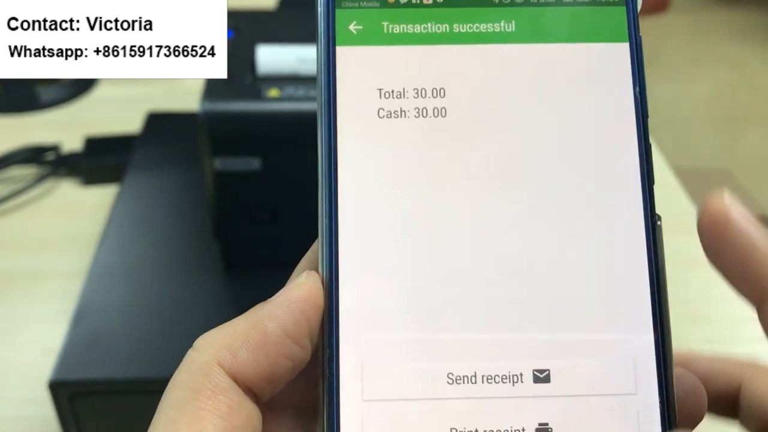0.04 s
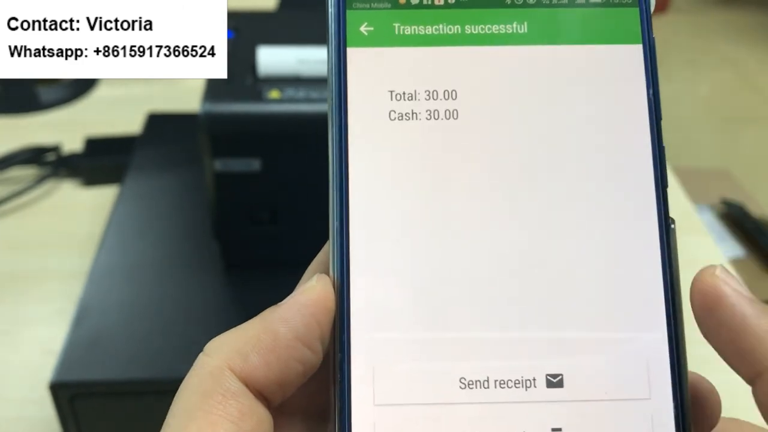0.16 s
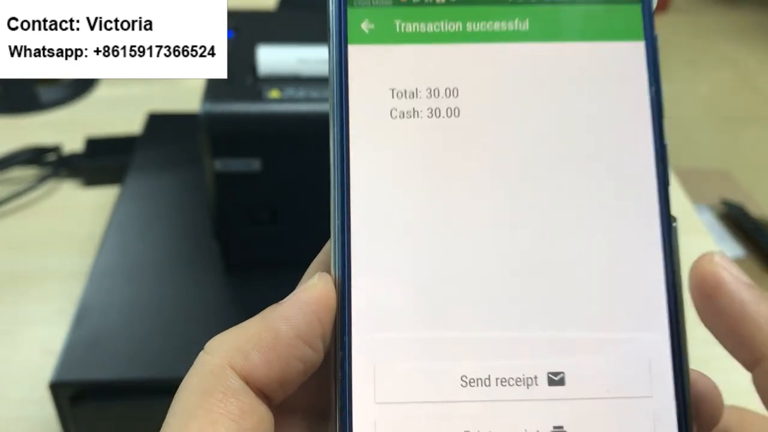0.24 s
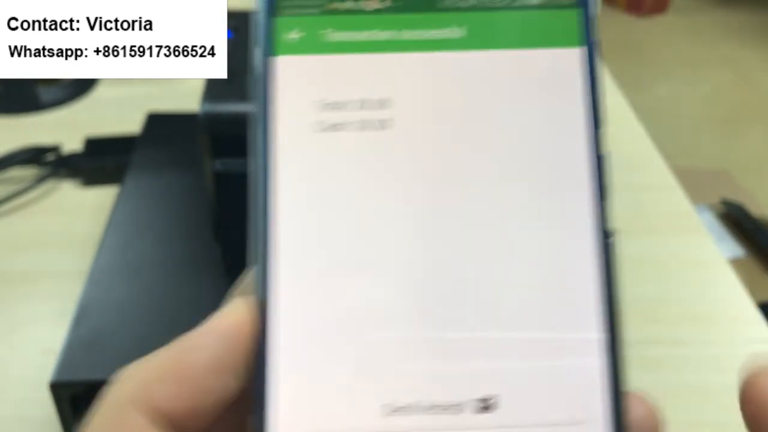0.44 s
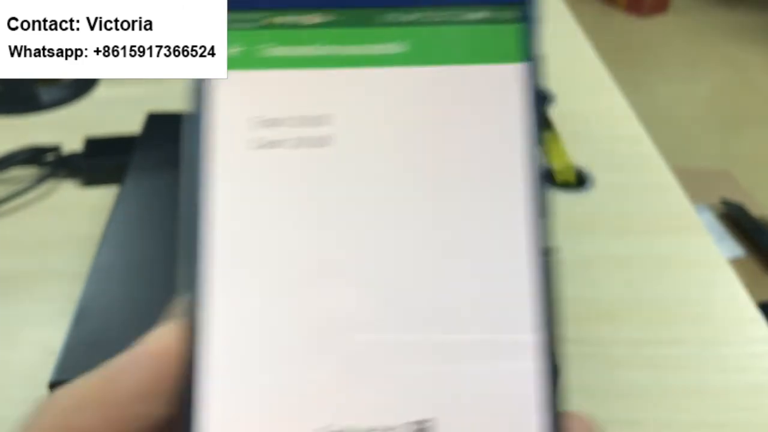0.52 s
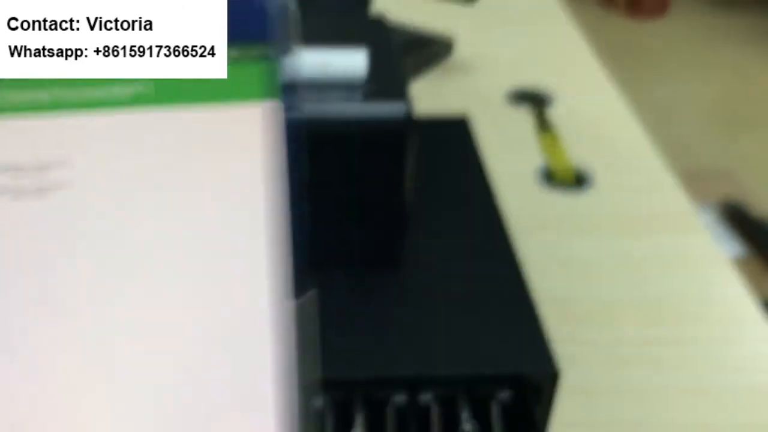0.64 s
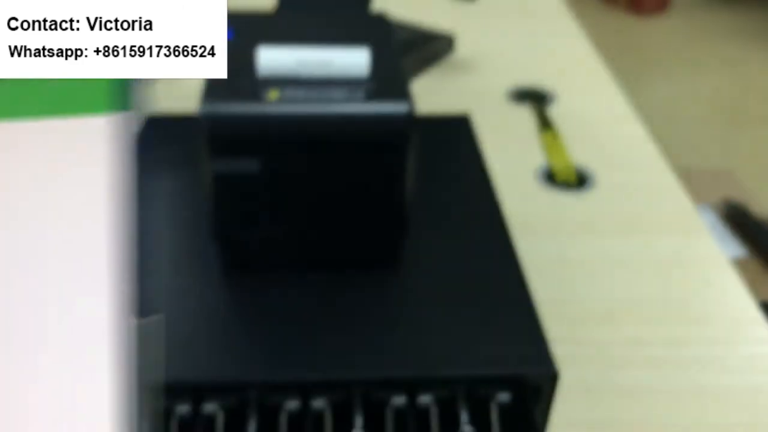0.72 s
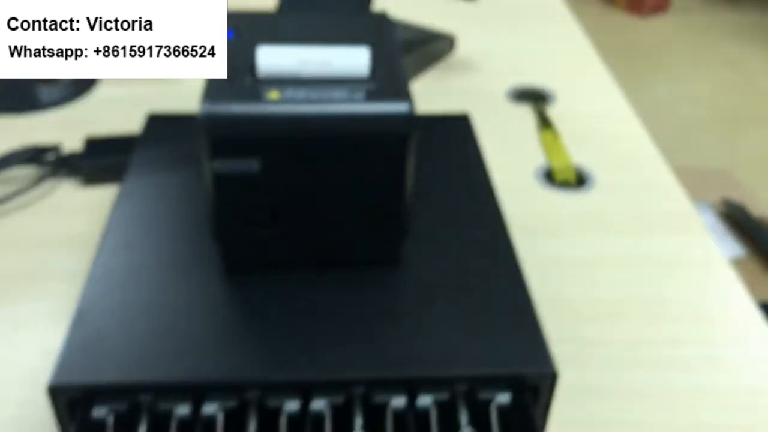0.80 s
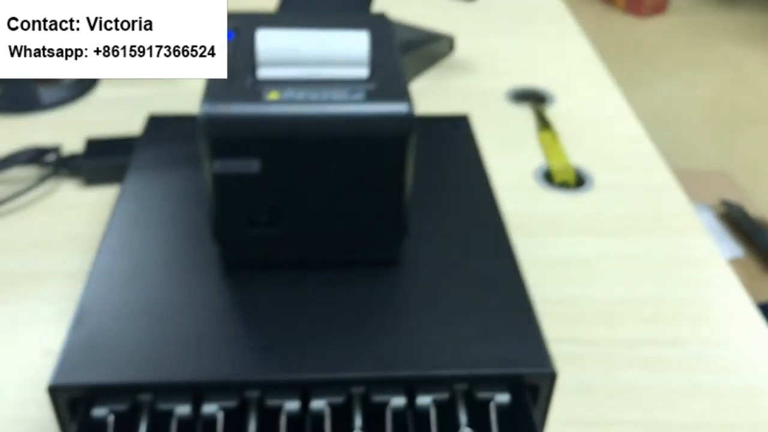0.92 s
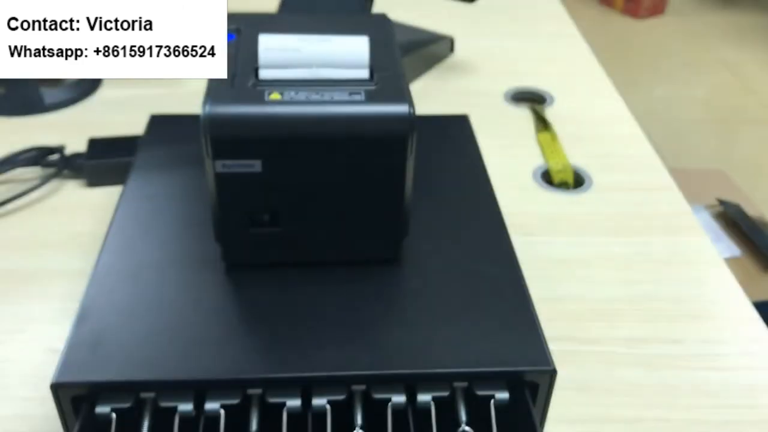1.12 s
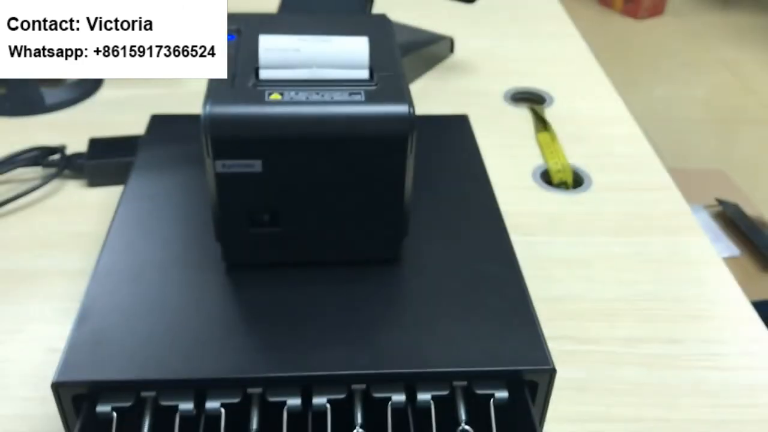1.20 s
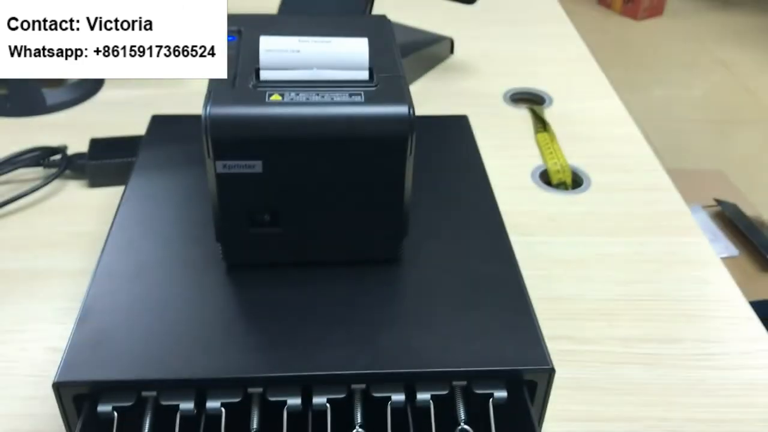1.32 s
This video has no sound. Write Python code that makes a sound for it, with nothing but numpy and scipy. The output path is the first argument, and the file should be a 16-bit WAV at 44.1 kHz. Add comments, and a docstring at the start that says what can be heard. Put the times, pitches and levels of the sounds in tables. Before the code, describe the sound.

Close microphone in a quiet, slightly reverberant office: a cash drawer latch snaps loudly, the tray rolls out and slams against its stop, metal rattles and settles, then a short paper hiss and small plastic clicks.

```python
"""A sheet-steel cash drawer under a receipt printer on a desk, heard from close by in a quiet office.
Its latch clacks and rebounds, and the tray rolls out with knocks and bangs against its stop:
gritty contact noise excites the modes of the steel case, and damped sines add ringing parts.
The printer clicks, drones low and feeds paper with a short hiss, all as coloured, shaped noise.
The room rings on as decaying noise over a nearly steady air hum."""
import sys
import numpy as np
from scipy import signal
from scipy.fft import rfft, irfft, next_fast_len
from scipy.io import wavfile
from scipy.ndimage import map_coordinates

SR = 44100
rng = np.random.default_rng(int(sys.argv[2]) if len(sys.argv) > 2 else 0)


def elevation(decibels):
    """Turn decibel levels (scalar or array-like) into linear amplitude ratios."""
    levels = np.asarray(decibels, float)
    return 10 ** (levels / 20)


def waveform_to_disk(signal):
    """Save audio, clipped to [-1, 1], as 16-bit WAV at the path in sys.argv[1]."""
    frames = np.transpose(np.atleast_2d(signal))
    scaled = np.clip(frames, -1, 1) * 32767
    samples = np.round(scaled).astype(np.int16)
    wavfile.write(sys.argv[1], SR, samples)


N = 59535

# Ventilation and office hum: time_s, level_db
AIR_LEVEL = [(0, -50), (1.05, -50), (1.35, -49)]
# Spectrum of the air hum: frequency_hz, relative_density_db
AIR_TONE = [(12, -24), (20, -1), (172, -6.5), (241, -9.5), (319, -11), (527, -16), (825, -17), (9950, -42),
            (15000, -59)]

# Bright printer clicks: start_s, level_db, contact_s, t60_s
CLICKS = [(.2253, -47.5, 0.009, 0.085), (.8003, -24.5, 0.0063, 0.0067), (.999, -33.5, 0.0055, 0.015),
          (1.0255, -23, 0.0015, 0.034), (1.2554, -44, 0.0021, 0.015)]
# Spectrum of clicks and paper ticks: frequency_hz, relative_density_db
CLICK_TONE = [(350, -50), (600, -1), (1560, -8), (2750, -8.5), (3410, 1), (4770, -6.5), (5320, 0),
              (7450, -2.5), (15000, -40)]
# Duller clunks of the printer shell: start_s, level_db, contact_s, t60_s
CLUNKS = [(1.0262, -24.5, 0.0075, 0.037)]
# Spectrum of the clunks: frequency_hz, relative_density_db
CLUNK_TONE = [(120, -25), (420, -11.5), (708, 2.5), (2800, -16), (3300, -41), (4000, -21), (5200, -43)]
# Modes of the printer's plastic shell and gears: pitch_hz, half_width_hz, weight_db (before ring)
PRINTER_MODES = [(692, 36, 4.5), (1283, 90, 4.5), (1587, 107, 5.5), (2333, 32, 4), (3330, 70, 2.5),
                 (3970, 230, 3), (5400, 51, 2), (7040, 110, 1.5)]

# Latch clack and rebounds: start_s, level_db, contact_s, t60_s
LATCH = [(.2452, -7, 0.0043, 0.038), (.256, -21, 0.027, 0.24), (.316, -40, 0.0028, 0.018),
         (.3205, -21, 0.0089, 0.022)]
# Spectrum of the latch and spring clips: frequency_hz, relative_density_db
LATCH_TONE = [(59, -40), (100, -14), (229, -8.5), (1010, -6), (1390, -0.5), (2420, -7.5), (4020, -2),
              (6560, -4), (12900, -15.5), (16000, -29)]
# Modes of the steel case: pitch_hz, half_width_hz, weight_db (before ring)
CASE_MODES = [(245, 31, 3.5), (312, 94, 2), (530, 28, 5), (630, 31, 4.5), (708, 44, 3), (760, 19, 0.5),
              (953, 22, 6.5), (1250, 76, 6), (1474, 140, 4.5), (1650, 84, 5), (1955, 46, 6),
              (3980, 63, 5.5), (4490, 50, 3), (5340, 79, 4)]

# Single panels of the case ring out: start_s, initial_level_db, pitch_hz, t60_s
PANELS = [(.247, -11, 1409, .05), (.322, -22, 734, 0.063), (.474, -25, 530, 0.038),
          (0.474, -20, 954, 0.046), (.6255, -7.5, 735, 0.03), (.63, -18.5, 312, 0.11),
          (.643, -21.5, 255.3, 0.26), (.648, -28.5, 154.8, 0.28), (.662, -18, 688, 0.075),
          (.912, -27.5, 713, 0.047)]
# Small parts ping, loose metal of the drawer and the printer's shell at its clicks: start_s, initial_level_db,
# pitch_hz, t60_s
PINGS = [(.631, -14, 4340, 0.037), (.694, -24, 4140, .025), (.7265, -23, 4260, 0.012),
         (.801, -21, 3330, 0.025), (.801, -25.5, 1514, 0.032), (1.027, -25, 1558, 0.053),
         (1.0262, -26.5, 3915, 0.032), (1.255, -45, 2290, 0.074)]
# The desk takes the shove: start_s, initial_level_db, pitch_hz, t60_s
SHOVES = [(0.647, -23, 65.5, 0.17), (0.69, -36, 72, 0.16)]

# Rolling, then shaking of the tray: time_s, level_db
ROLL_LEVEL = [(.262, -30.5), (.36, -37.5), (.42, -38), (.52, -36.5), (.6, -34), (.7, -38), (.8, -40),
              (.93, -41.5), (1.0, -50)]
# Spectrum of the rolling: frequency_hz, relative_density_db
ROLL_TONE = [(71, -33), (120, -8.5), (253, 2), (484, -7.5), (852, -5), (1110, -10), (1200, -16.5),
             (5140, -30), (15000, -42)]
# Knocks of the rolling tray: start_s, level_db, contact_s, t60_s
KNOCKS = [(.41, -29, 0.0023, 0.068), (.423, -29, 0.0021, 0.038), (.468, -31, 0.0037, 0.014),
          (.4745, -29, 0.001, 0.089), (.53, -40, 0.026, 0.15)]
# Spectrum of the knocks: frequency_hz, relative_density_db
KNOCK_TONE = [(88, -23), (150, -8), (467, -3), (991, -8.5), (2180, -14.5), (3390, -15), (5560, -20.5),
              (12000, -33.5), (15600, -74)]

# Low drone felt through the desk: time_s, level_db
MOTOR_LEVEL = [(.5, -52), (.58, -47.5), (.8, -55), (.9, -46), (1.05, -47), (1.2, -49.5), (1.35, -55)]
# Spectrum of the drone: frequency_hz, relative_density_db
MOTOR_TONE = [(25, -70), (40, -13.5), (60, -1.5), (85, 10), (105, -21.5), (300, -50)]

# The tray's bangs at its stop: start_s, level_db, contact_s, t60_s
STOP = [(.6225, -18, 0.0055, 0.16), (.627, -18, 0.0059, 0.064), (.641, -35.5, 0.0037, 0.18)]
# Spectrum of the bangs: frequency_hz, relative_density_db
STOP_TONE = [(180, -29), (300, 1.5), (735, 1.5), (1090, -2.5), (1630, -1.5), (2770, -4.5), (4480, -5),
             (8840, -9), (10600, -24.5), (11700, -19.5), (15800, -36)]
# The tray's spring clips jangle after the stop: start_s, level_db, contact_s, t60_s
CLIPS = [(.629, -37, 0.013, 0.23)]
# Thuds of the case after the stop: start_s, level_db, contact_s, t60_s
THUDS = [(.634, -22.5, 0.013, 0.068), (.647, -20, 0.0027, 0.12), (.668, -20.5, 0.0025, 0.13),
         (.718, -29.5, 0.0052, 0.068), (.77, -43, 0.017, 0.19), (.999, -33, 0.0063, 0.024),
         (1.04, -41, 0.011, 0.11)]
# Spectrum of the thuds: frequency_hz, relative_density_db
THUD_TONE = [(40, -25), (90, 1), (287, 2), (379, -0.5), (433, -10.5), (624, -3.5), (862, -3.5),
             (1300, -13.5), (3000, -14.5), (4200, -61)]

# A faint broad rustle: time_s, level_db
RUSTLE_LEVEL = [(.82, -51), (1.05, -44.5), (1.15, -52), (1.35, -53)]
# Spectrum of the rustle: frequency_hz, relative_density_db
RUSTLE_TONE = [(470, -32), (800, -20), (895, 0), (1780, -8), (2680, -7.5), (7950, -16), (15800, -52)]
# Hiss of the paper feed: time_s, level_db
PAPER_LEVEL = [(0.888, -49), (0.916, -45.5), (0.982, -35.5), (1.0, -39.5)]
# Spectrum of the feed hiss: frequency_hz, relative_density_db
PAPER_TONE = [(1700, -34), (3270, -8), (4630, -13), (8850, -7.5), (11300, -24), (14000, -15.5),
              (15600, -38)]
# The paper edge catches: start_s, level_db, contact_s, t60_s
TICKS = [(.8915, -30, 0.00073, 0.0036), (.8965, -35, 0.0017, .006)]

# Decay of the room: frequency_hz, t60_s
ROOM_DECAY = [(100, 0.51), (600, 0.67), (3000, 0.73), (12000, 0.47)]

ATTACK_S, FADE_S = 0.001082, 0.004  # rise of a blow or ring; fade at both ends of a rub
STRIKE_DB = 10  # the first contact of a blow over its chatter
FLEX_SHIFT, FLEX_PER_S = 0.046, 25  # spread of the detuning as a share of pitch; pace of wandering
ROOM_DB, UNEVEN_DB = -12, -35  # the room's sound; the faint difference between the channels


def unit(x):
    """Normalisation: a signal divided by its root mean square has unit power."""
    return x / np.sqrt(np.mean(x ** 2) + 1e-20)


def along(points, hz):
    """Logarithmic frequency scale: values are interpolated linearly in log frequency."""
    f, v = np.transpose(points)
    return np.interp(np.log(hz + 1), np.log(f + 1), v)


def coloured(x, tone, modes=(), ring=1):
    """Minimum-phase filtering: a causal response of unit mean power, with resonances at the modes."""
    m = 2 * (next_fast_len(N + SR // 2) // 2)
    hz = np.fft.rfftfreq(m, 1 / SR)
    resonance_db = sum(2 * db / (1 + ((hz - c) / w) ** 2) for c, w, db in modes)
    level_db = np.maximum(along(tone, hz), -90) + ring * resonance_db
    # folding the cepstrum onto positive time makes the response causal
    cepstrum = irfft(np.log(unit(elevation(level_db))), m)
    cepstrum[1:m // 2] *= 2
    cepstrum[m // 2 + 1:] = 0
    response = np.exp(rfft(cepstrum))
    return irfft(rfft(x, m) * response, m)[:N]


def flexing(x, tone, modes, ring):
    """Wandering resonance: the sound passes by turns through three detuned copies of the object."""
    knots = rng.standard_normal((3, int(N * FLEX_PER_S / SR) + 4))
    position = np.meshgrid(np.arange(3), np.arange(N) * FLEX_PER_S / SR, indexing="ij")
    turns = np.exp(2 * map_coordinates(knots, position))
    share = turns / turns.sum(0)
    out = np.zeros(N)
    for part in share:
        detuned = [(hz * (1 + FLEX_SHIFT * rng.standard_normal()), w, db) for hz, w, db in modes]
        out += coloured(part * x, tone, detuned, ring)
    return out


def grit(spread_db, grain_s):
    """Granular contact noise: many tiny contacts of scattered size, at unit power."""
    size_db = spread_db * rng.standard_normal(int(N / SR / grain_s) + 2)
    grain = (np.arange(N) / SR / grain_s).astype(int)
    return unit(rng.standard_normal(N) * elevation(size_db[grain]))


def blows(rows, tone, modes, ring):
    """Impact: one clean contact, chatter for the contact length, then an exponential rattle."""
    t = np.arange(N) / SR
    envelope = np.zeros(N)
    for start, db, contact, t60 in rows:
        decay = elevation(db - 60 * np.clip(t - start - contact, 0, None) / t60)
        envelope += decay * np.clip((t - start) / ATTACK_S, 0, 1)
    start, db = np.transpose(rows)[:2]
    strikes = np.bincount(((start + ATTACK_S) * SR).astype(int), elevation(db + STRIKE_DB), N)
    chatter = envelope * grit(spread_db=2.5, grain_s=0.0006)
    return coloured(chatter + strikes, tone, modes, ring)


def rubbing(rows, tone, modes, ring, spread_db, grain_s, colour=coloured):
    """Friction: gritty contact noise follows a level curve and fades at both ends."""
    t = np.arange(N) / SR
    s, db = np.transpose(rows)
    gate = np.clip(np.minimum(t - s[0], s[-1] - t) / FADE_S, 0, 1)
    rub = gate * elevation(np.interp(t, s, db)) * grit(spread_db, grain_s)
    return colour(rub, tone, modes, ring)


def rings(rows):
    """Free vibration: each row is one exponentially damped sine with a soft start."""
    t = np.arange(N) / SR
    out = np.zeros(N)
    for start, db, hz, t60 in rows:
        after = np.clip(t - start, 0, None)
        decay = elevation(db - 60 * after / t60) * np.clip(after / ATTACK_S, 0, 1)
        out += decay * np.sin(2 * np.pi * hz * after)
    return out


def air():
    """Broadband flow noise: ventilation and office hum as random noise with a falling spectrum."""
    level = elevation(np.interp(np.arange(N) / SR, *np.transpose(AIR_LEVEL)))
    return level * unit(coloured(rng.standard_normal(N), AIR_TONE))


def printer_impacts():
    """Impact on a shell: bright clicks and duller clunks excite the plastic shell and gears."""
    clicks = blows(CLICKS, CLICK_TONE, PRINTER_MODES, ring=1.5)
    return clicks + blows(CLUNKS, CLUNK_TONE, PRINTER_MODES, ring=0.79)


def latch():
    """Impact and rebound: the latch strikes repeatedly and excites the modes of the case."""
    return blows(LATCH, LATCH_TONE, CASE_MODES, ring=0.37)


def ringing_parts():
    """Free vibration: case panels, small loose metal parts, the printer's shell and the desk ring at single
    pitches."""
    return rings(PANELS + PINGS + SHOVES)


def rolling_tray():
    """Rolling friction: fine grit drives case modes that wander as the tray moves."""
    return rubbing(ROLL_LEVEL, ROLL_TONE, CASE_MODES, ring=0.65, spread_db=1.5, grain_s=0.003,
                   colour=flexing)


def tray_knocks():
    """Impact on the case: short knocks of the tray excite its modes."""
    return blows(KNOCKS, KNOCK_TONE, CASE_MODES, ring=0.65)


def motor():
    """Structure-borne sound: a narrow low band of noise forms the drone felt through the desk."""
    return rubbing(MOTOR_LEVEL, MOTOR_TONE, (), ring=0, spread_db=0.5, grain_s=0.018)


def stop_crash():
    """Impact at a stop: bangs excite the case, with jangling spring clips and low thuds after."""
    bangs = blows(STOP, STOP_TONE, CASE_MODES, ring=0.28)
    clips = blows(CLIPS, LATCH_TONE, CASE_MODES, ring=0.24)
    return bangs + clips + blows(THUDS, THUD_TONE, CASE_MODES, ring=0.54)


def rustle():
    """Granular noise: uneven grains in a broad band form a faint rustle."""
    return rubbing(RUSTLE_LEVEL, RUSTLE_TONE, (), ring=0, spread_db=2.5, grain_s=0.004)


def paper_feed():
    """Sliding friction: gritty hiss colours the printer's modes, with ticks as the edge catches."""
    hiss = rubbing(PAPER_LEVEL, PAPER_TONE, PRINTER_MODES, ring=0.7, spread_db=2, grain_s=0.0016)
    return hiss + blows(TICKS, CLICK_TONE, (), ring=0)


def room(x):
    """Reverberation: convolution with noise in which each frequency dies at its own speed."""
    hz, t, z = signal.stft(rng.standard_normal(SR), SR, nperseg=256)
    decay = elevation(-60 * t / along(ROOM_DECAY, hz)[:, None])
    tail = signal.istft(z * decay, SR, nperseg=256)[1]
    delayed = np.pad(x, (300, 0))  # samples
    return signal.fftconvolve(delayed, tail / np.linalg.norm(tail))[:N]


def scene():
    """Superposition: direct sounds, their reverberation and air hum add in two nearly equal channels."""
    drawer = latch() + ringing_parts() + rolling_tray() + tray_knocks() + stop_crash()
    printer = printer_impacts() + motor() + rustle() + paper_feed()
    near = drawer + printer
    mono = near + elevation(ROOM_DB) * room(near) + air()
    # a faint, mostly treble difference enters the channels with opposite signs
    uneven = elevation(UNEVEN_DB) * room(np.diff(near, prepend=0) + 0.18 * near)
    return np.array([mono + uneven, mono - uneven])


def band_limit(x):
    """A steep low-pass at the top of the band."""
    return signal.sosfilt(signal.butter(12, 16490, fs=SR, output="sos"), x)


def record(dry):
    """Saturation and band limiting: a soft ceiling bounds the peaks and a smooth edge ends the treble."""
    ceiling, top_hz, edge_hz = 0.9, 16300, 800
    limited = dry / (1 + np.abs(dry / ceiling) ** 6) ** (1 / 6)
    below_top = np.clip((top_hz - np.fft.rfftfreq(N, 1 / SR)) / edge_hz, 0, 1)
    edge = np.sin(np.pi / 2 * below_top) ** 2
    mix = irfft(rfft(limited) * edge, N)
    return band_limit(mix)


dry = scene()
out = record(dry)
waveform_to_disk(out)
```